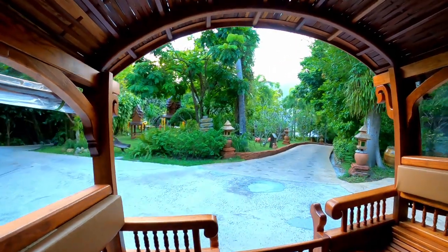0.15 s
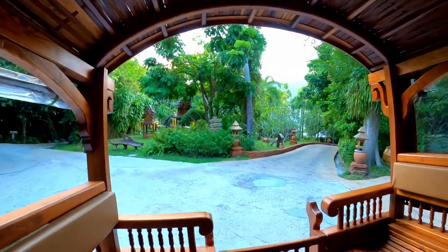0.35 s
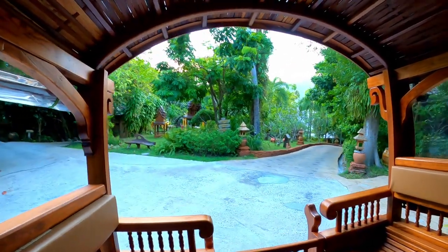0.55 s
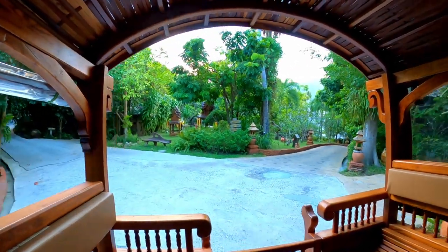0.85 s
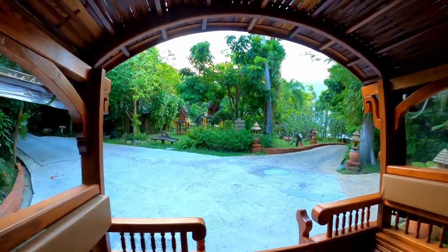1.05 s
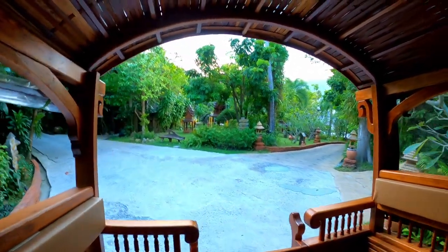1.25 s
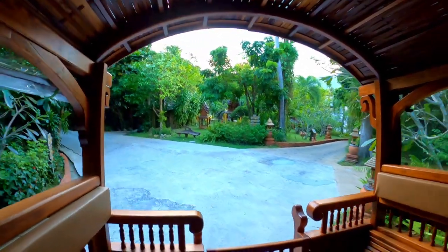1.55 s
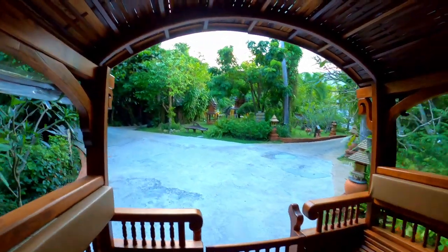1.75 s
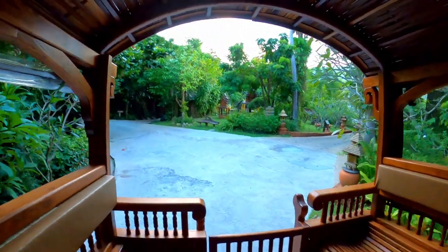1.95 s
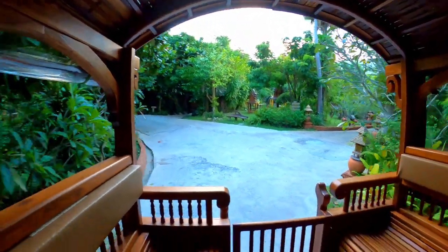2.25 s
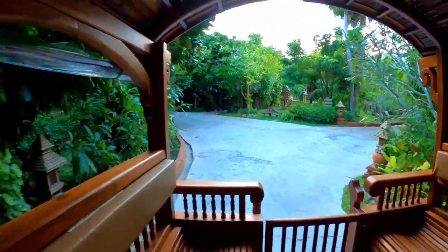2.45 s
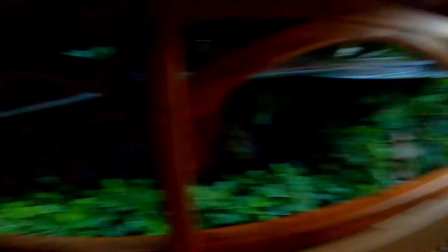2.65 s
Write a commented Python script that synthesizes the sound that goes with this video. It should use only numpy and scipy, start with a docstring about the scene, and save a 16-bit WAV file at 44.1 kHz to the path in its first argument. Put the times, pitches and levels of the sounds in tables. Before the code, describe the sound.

Onboard an open wooden shuttle cart outdoors, a deep fluttering engine hum runs throughout over rolling tyre noise; loose benches chatter early and again midway, with scattered frame knocks, close microphone, stereo narrowing to the centre.

```python
"""An open wooden shuttle cart, heard from a passenger seat while a small engine drones at a nearly steady speed.
The engine is fluttering sines: exhaust throb, hum, boom and overtones; random firing pulses in resonances mutter.
Shaped noise makes the rumble and hiss of the tyres on the paving; sparse impacts and taps through wood
resonances make the benches chatter and rap, coloured noise bursts knock in the frame, and loose parts tick.
The scene opens in a jolt that dies away; later the stereo image closes to the centre."""
import sys
import numpy as np
from scipy import signal
from scipy.fft import rfft, irfft, next_fast_len
from scipy.io import wavfile

SR = 44100
rng = np.random.default_rng(int(sys.argv[2]) if len(sys.argv) > 2 else 0)


def unload_audio(sound):
    """Save the sound as a 16-bit wav file, at the path given as the first command line argument."""
    columns = np.transpose(np.atleast_2d(sound))
    # keep every value between -1 and 1, then stretch to whole-number steps
    steps = np.round(np.clip(columns, -1, 1) * 32767)
    wavfile.write(sys.argv[1], SR, steps.astype(np.int16))


N = 123479

# engine speed before its small wobble: (time [s], base pitch [Hz])
ENGINE_SPEED = [(0.0, 59.35), (0.15, 58.54), (0.38, 56.4), (0.6, 53.88), (0.88, 54.06), (1.1, 55.28),
                (1.28, 56.94), (1.45, 56.54), (1.7, 56.08), (1.86, 58.4), (2.02, 56.72), (2.2, 57.78),
                (2.31, 57.4), (2.42, 57.56), (2.55, 57.44), (2.68, 58.7), (2.8, 59.35)]
# exhaust throb: (time [s], level [dB])
THROB_LEVEL = [(0, -21.5), (.05, -20.5), (.1, -18), (.16, -24), (.21, -17), (.42, -17), (.62, -18),
               (1.3, -18.7), (1.46, -17), (1.53, -17.7), (1.58, -21.5), (1.63, -17.5), (1.68, -21.5),
               (1.74, -17), (1.86, -19), (2.45, -19), (2.65, -17.7), (2.8, -21)]
# hum an octave above the base pitch: (time [s], level [dB])
OCTAVE_LEVEL = [(0, -32), (.12, -33), (.25, -41), (.65, -41.5), (.84, -34.5), (1.0, -47), (1.18, -36),
                (1.35, -43), (1.7, -43.5), (1.86, -37.5), (2.0, -39.5), (2.17, -47), (2.3, -33), (2.5, -48),
                (2.68, -32.5), (2.8, -35.5)]
# one overtone that makes the body boom: (time [s], level [dB])
BOOM_LEVEL = [(0, -32.5), (.15, -51.5), (.31, -33.5), (.4, -53), (1.05, -51.5), (1.4, -45), (1.66, -37),
              (1.77, -49), (1.84, -32), (2.15, -39), (2.3, -32.5), (2.4, -39), (2.52, -36), (2.8, -31)]
# other tones of engine and drive: (multiple of base pitch, level before the overtone curve [dB], flutter [0-1])
ENGINE_TONES = [(.5, -45.5, .3), (2.75, -47, 0), (3, -40.5, .25), (3.75, -43, 0.25), (4, -44, 0.5),
                (4.25, -54.5, 0.9), (4.5, -50, 0.8), (4.87, -49.5, 0.9), (6, -47.5, 0), (6.25, -53.5, 0.5),
                (6.75, -56, 0.8), (7.25, -56.5, 0.4), (9, -63, 0.9), (9.78, -59, 1)]
# shared rise and fall of the other tones and the mutter: (time [s], level change [dB])
OVERTONE_LEVEL = [(0, -6), (.35, -2.5), (.65, -0.5), (1.25, 0.5), (1.65, -1.5), (2.0, -1), (2.25, -7),
                  (2.55, 0), (2.8, -8)]
# body resonances shaken by each firing: (centre [Hz], width [Hz], relative level [dB])
BODY_MODES = [(122, 6.7, -5), (177, 36, -0.5), (220.4, 31, 6.5), (296, 7.1, -7.5), (324, 150, -27),
              (393, 90, -3.5), (494, 49, -12)]
# tone colour of the road rumble: (frequency [Hz], relative level [dB])
RUMBLE_COLOUR = [(12, -14), (22, -4.5), (30, -3), (42, -2.5), (64, 0), (80, -6.5), (130, -7), (220, -23.5),
                 (300, -19), (450, -22.5), (800, -71)]
# tone colour of the tyre hiss: (frequency [Hz], relative level [dB])
TYRE_COLOUR = [(200, -5.5), (450, 3.5), (650, -1), (800, -1), (1100, -4), (1550, -6), (2100, -12),
               (2800, -13), (4000, -18.5), (5500, -22), (7700, -30), (8700, -31.5), (10500, -40),
               (14000, -65.5)]
# rise and fall of the hiss: (time [s], level change [dB], extra treble [dB])
HISS_LEVEL = [(0, 2, 0), (.45, 0, -2), (.66, -.5, -1.5), (.84, 1.5, -1.5), (1.0, -1.5, -0.5),
              (1.25, -0.5, -0.5), (1.43, -0.5, 2), (1.7, -.5, 1.5), (1.9, 0, 2.5), (2.15, 0.5, 0),
              (2.5, 0, 3), (2.68, 0, 4.5), (2.8, 0, 1.5)]
# stereo width: (frequency [Hz], gain on the side signal [dB])
STEREO_WIDTH = [(60, -16), (130, -30), (250, -34), (500, -32), (800, -17.5), (1260, -14), (2300, -8),
                (4200, -5.5), (10000, -4)]
# flurries of bench chatter: (time [s], level [dB], length before release [s])
CHATTER_FLURRIES = [(0.227, -53.5, 0.063), (0.305, -49, 0.033), (0.336, -43, 0.045), (0.428, -41.5, 0.025),
                    (0.491, -43.5, 0.022), (0.555, -52.5, 0.01), (1.427, -46.5, 0.032), (1.538, -46, 0.033),
                    (1.598, -53, 0.011), (1.806, -48, 0.029), (1.926, -50, 0.014)]
# bench resonances: (centre [Hz], width [Hz], relative level [dB])
BENCH_MODES = [(495, 31, 2), (654, 30, 7), (890, 70, -5), (1040, 80, -6), (1357, 31, -4.5),
               (1509, 45, -2.5), (1730, 55, -7.5), (1844, 65, -12), (2284, 140, -15), (3160, 650, -25.5)]
# distinct raps of the bench slats: (time [s], level [dB], extra treble [dB])
SLAT_RAPS = [(.35, -37, -3), (.358, -39, -2), (.374, -46, 10), (.437, -43.5, 1), (.451, -46, 5),
             (.499, -45, 0), (.521, -46.5, 9), (1.431, -49, 7), (1.547, -39.5, -4), (1.592, -44, -3),
             (1.812, -47, -4), (1.927, -46, 9), (1.942, -47, -4)]
# frame knocks: (time [s], level [dB], centre of brightness [Hz], decay [s], left minus right [dB])
FRAME_KNOCKS = [(.057, -41, 400, .012, -3), (.773, -38, 780, 0.0035, -4), (.775, -46, 3100, 0.005, 2.5),
                (.809, -53, 2410, .01, 5), (.85, -55, 2400, .014, 0), (1.812, -44, 465, 0.011, -1),
                (1.941, -43, 480, .009, 0), (2.296, -39, 950, 0.004, -2), (2.42, -63, 6000, .012, 7),
                (2.678, -49, 2000, 0.007, -2), (2.733, -44, 1700, 0.004, -2), (2.74, -41, 340, .02, 0)]
# frame resonances: (centre [Hz], width [Hz], relative level [dB])
FRAME_MODES = [(333, 110, 10), (587, 300, 5.5), (860, 55, 5), (1080, 70, 0.5), (1260, 110, 2),
               (1730, 100, -1.5), (1938, 34, -4), (2660, 150, -9), (3305, 150, -8.5), (5800, 2400, -23.5)]

SPEED_WOBBLE, WOBBLE_HZ = 0.005, 18  # wobble as a fraction of speed
JOLT_S = 0.19  # time for the opening jolt to fall to 1/e
THROB_FLUTTER, THROB_FLUTTER_HZ, JOLT_FLUTTER = 0.09, 14, 0.25
BOOM_MULTIPLE, BOOM_FLUTTER = 3.52, 0.1
OCTAVE_FLUTTER, FLUTTER_HZ = 0.2, 6
MUTTER_DB, MUTTER_TOP_HZ = -45, 900
RUMBLE_DB, JOLT_DB = -35.5, 6.5  # base level and its lift at the height of the jolt
TYRES_DB, TREBLE_HZ, PULSE_DEPTH = -47.5, 6330, 0.029
LEFT_DB = 1.15  # left minus right
CHATTER_PER_S, CHATTER_ATTACK_S, CHATTER_RELEASE_S, CHATTER_TOP_HZ = 3400, 0.0053, 0.029, 5000
RAP_S, RAP_TREBLE_HZ, RAP_TOP_HZ = 0.0059, 1200, 2780  # energy length, start of treble, dulling by soft wood
RAP_SCATTER_DB = 3.5  # random spread of the mode levels
GRAZE_S, GRAZE_DB = 0.0028, -4.5
KNOCK_OCTAVES, KNOCK_SNAP, KNOCK_SCRAPE = 0.89, 0.51, 0.85  # colour spread, weights of contact and scrape
FITTING_COUNT, FITTING_LOW_HZ, FITTING_HIGH_HZ, FITTING_WIDTH_HZ = 36, 764, 3600, 58
FITTING_MIN_DB, FITTING_MAX_DB = -63.5, -53.5  # for the highest note; lower notes are lifted
NARROW_FROM_S, NARROW_DB_PER_S = 1, 28.5
FADE_IN_S, TOP_HZ = 0.004, 14500


def undb(db):
    """Decibels to gain."""
    return 10 ** (np.asarray(db) / 20)


def unit(x):
    """Scale to rms 1."""
    return x / np.sqrt(np.mean(x ** 2) + 1e-20)


def even(response):
    """Scale a filter to rms gain 1 across the spectrum."""
    return response / np.sqrt(np.mean(abs(response) ** 2))


def times():
    """Time of each sample [s]."""
    return np.arange(N) / SR


def freqs():
    """Frequency of each spectral bin [Hz], kept at 1 or above."""
    size = next_fast_len(N, True)
    return np.maximum(np.arange(size // 2 + 1) * SR / size, 1)


def curve(rows, axis=1):
    """One column of a table, joined by straight lines in time."""
    rows = np.array(rows)
    return np.interp(times(), rows[:, 0], rows[:, axis])


def shape(points):
    """Gain per frequency, joined in dB over log frequency."""
    hz, db = np.array(points).T
    return undb(np.interp(np.log(freqs()), np.log(hz), db))


def ring(modes):
    """Response of a set of damped resonances, with alternating sign."""
    f = freqs()
    response = 0
    for k, (hz, width, db) in enumerate(modes):
        response = response + (-1) ** k * undb(db) / (1 + 1j * (f * f - hz * hz) / (f * width))
    return response


def through(x, response):
    """Filter a sound by its spectrum."""
    size = next_fast_len(N, True)
    return irfft(rfft(x, size) * response, size)[..., :N]


def noise():
    """White noise."""
    return rng.standard_normal(N)


def walk(hz):
    """Smooth random drift with rms 1."""
    return unit(through(noise(), np.exp(-(freqs() / hz) ** 2)))


def tap(start, length):
    """One sharp contact with the energy of a unit sound of that length."""
    return (np.arange(N) == int(start * SR)) * np.sqrt(length * SR)


def spread(mid, side, left_db):
    """Reflections under the roof widen the sound, mostly its treble."""
    side = through(side, shape(STEREO_WIDTH))
    return np.array([(mid + side) * undb(left_db / 2), (mid - side) * undb(-left_db / 2)])


def jolt():
    """Shaking of the cart that dies away from the start, 1 towards 0."""
    return np.exp(-(times() / JOLT_S) ** 2)


def engine_tone(turns, multiple, flutter, rate):
    """A sine locked to the engine; random drift of its phasor makes level and phase flutter."""
    swing = 1 + flutter * (walk(rate) + 1j * walk(rate)) / np.sqrt(2)
    phase = 2 * np.pi * (multiple * turns + rng.random())
    return unit(np.real(swing * np.exp(1j * phase)))


def drone(turns):
    """Exhaust throb, unsteadier in the opening jolt, with octave hum, body boom and overtones."""
    throb_flutter = THROB_FLUTTER + JOLT_FLUTTER * jolt()
    throb = undb(curve(THROB_LEVEL)) * engine_tone(turns, 0.99, throb_flutter, THROB_FLUTTER_HZ)
    boom = undb(curve(BOOM_LEVEL)) * engine_tone(turns, BOOM_MULTIPLE, BOOM_FLUTTER, FLUTTER_HZ)
    octave = undb(curve(OCTAVE_LEVEL)) * engine_tone(turns, 2, OCTAVE_FLUTTER, FLUTTER_HZ)
    others = 0
    for multiple, db, flutter in ENGINE_TONES:
        others = others + undb(db) * engine_tone(turns, multiple, flutter, FLUTTER_HZ)
    return throb + boom + octave + undb(curve(OVERTONE_LEVEL)) * others


def mutter(turns):
    """Firings of random strength, one per turn, shake the body resonances softly."""
    firings = np.diff(np.floor(turns), prepend=0) * noise()
    soft = 1 / (1 + 1j * freqs() / MUTTER_TOP_HZ) ** 2
    body = unit(through(firings, ring(BODY_MODES) * soft))
    return undb(MUTTER_DB + curve(OVERTONE_LEVEL)) * body


def rumble():
    """Low noise of the wheels through the chassis, hardest in the opening jolt."""
    return undb(RUMBLE_DB + JOLT_DB * jolt()) * unit(through(noise(), shape(RUMBLE_COLOUR)))


def hiss(turns):
    """Broad noise of tyres and machinery, pulsing a little with the engine."""
    pulse = 1 + PULSE_DEPTH * np.cos(2 * np.pi * turns)
    gain = undb(TYRES_DB + curve(HISS_LEVEL)) * pulse
    treble_filter = 1 / (1 + (TREBLE_HZ / freqs()) ** 4)
    treble_lift = undb(curve(HISS_LEVEL, axis=2)) - 1

    def layer():
        tyres = unit(through(noise(), shape(TYRE_COLOUR)))
        return gain * (tyres + treble_lift * through(tyres, treble_filter))
    return spread(layer(), layer(), LEFT_DB)


def benches():
    """Short flurries of tiny impacts of either sign ring the loose wooden benches."""
    t, gain = times(), 0
    for start, db, length in CHATTER_FLURRIES:
        attack = np.clip((t - start) / CHATTER_ATTACK_S, 0, 1)
        release = np.exp(-np.maximum(t - start - length, 0) / CHATTER_RELEASE_S)
        gain = gain + undb(db) * attack * release
    wood = even(ring(BENCH_MODES) / (1 + 1j * freqs() / CHATTER_TOP_HZ))

    def layer():
        impacts = unit((rng.random(N) < CHATTER_PER_S / SR) * np.sign(noise()))
        return through(gain * impacts, wood)
    return spread(layer(), layer(), LEFT_DB)


def raps():
    """Single slats graze their rails, hit and ring on, each with its own mode levels."""
    t, out = times(), 0
    for start, db, treble_db in SLAT_RAPS:
        modes = [(hz, width, mode_db + RAP_SCATTER_DB * rng.standard_normal())
                 for hz, width, mode_db in BENCH_MODES]
        treble = undb(treble_db / (1 + (RAP_TREBLE_HZ / freqs()) ** 4))
        soft = 1 / (1 + 1j * freqs() / RAP_TOP_HZ) ** 2
        wood = even(ring(modes) * treble * soft)
        # the graze swells into the hit and fades as fast after it
        graze = undb(GRAZE_DB) * np.exp(-abs(t - start) / GRAZE_S) * noise()
        out = out + undb(db) * through(graze + tap(start, RAP_S), wood)
    return spread(out, np.zeros(N), LEFT_DB)


def knocks():
    """Blows in the frame joints: a snap and a decaying scrape, each with its own brightness and side."""
    t, frame, out = times(), ring(FRAME_MODES), 0
    for start, db, hz, decay, left_db in FRAME_KNOCKS:
        octaves_away = np.log2(freqs() / hz)
        colour = even(frame * np.exp(-0.5 * (octaves_away / KNOCK_OCTAVES) ** 2))
        envelope = (t >= start) * np.exp(-np.maximum(t - start, 0) / decay)
        scrape = envelope * rng.standard_normal((2, N))
        blow = KNOCK_SCRAPE * scrape + KNOCK_SNAP * tap(start, decay)
        mid, side = undb(db) * through(blow, colour) * np.sqrt(2)
        out = out + spread(mid, side, left_db)
    return out


def fittings():
    """Small loose parts tick at random as decaying sines, the higher notes fainter."""
    t, out = times(), np.zeros(N)
    for when, pitch, strength in rng.random((FITTING_COUNT, 3)):
        hz = FITTING_LOW_HZ * (FITTING_HIGH_HZ / FITTING_LOW_HZ) ** pitch
        age = np.maximum(t - when * t[-1], 0)
        db = FITTING_MIN_DB + (FITTING_MAX_DB - FITTING_MIN_DB) * strength
        gain = undb(db) * np.sqrt(FITTING_HIGH_HZ / hz)
        out += gain * np.exp(-np.pi * FITTING_WIDTH_HZ * age) * np.sin(2 * np.pi * hz * age)
    return spread(out, np.zeros(N), LEFT_DB)


def scene():
    """Engine, road and woodwork around a passenger seat, all summed in stereo."""
    speed = curve(ENGINE_SPEED) * (1 + SPEED_WOBBLE * walk(WOBBLE_HZ))
    turns = np.cumsum(speed) / SR
    engine = drone(turns) + mutter(turns)
    road = spread(rumble(), rumble(), 0) + hiss(turns)
    woodwork = benches() + raps() + knocks() + fittings()
    return engine + road + woodwork


def record(dry):
    """Close the stereo image to the centre, fade in briefly and cut the top steeply."""
    t = times()
    mid, side = (dry[0] + dry[1]) / 2, (dry[0] - dry[1]) / 2
    side = side * undb(-NARROW_DB_PER_S * np.maximum(t - NARROW_FROM_S, 0))
    heard = np.array([mid + side, mid - side]) * np.minimum(t / FADE_IN_S, 1)
    top_cut = signal.ellip(8, 0.2, 70, TOP_HZ, fs=SR, output="sos")
    return signal.sosfilt(top_cut, heard)


dry = scene()
out = record(dry)
unload_audio(out)
```